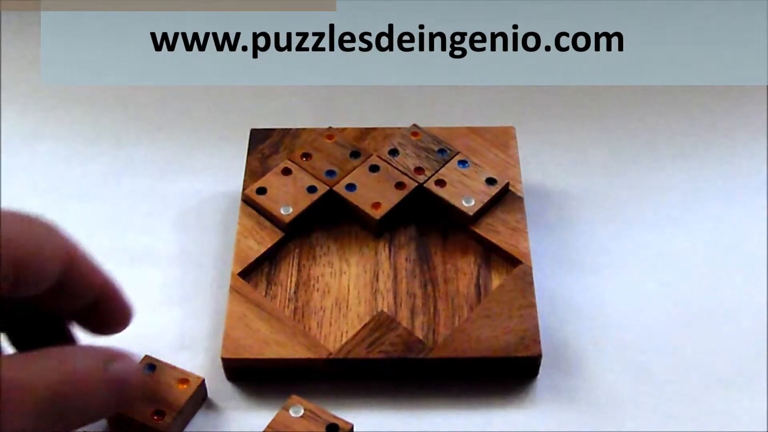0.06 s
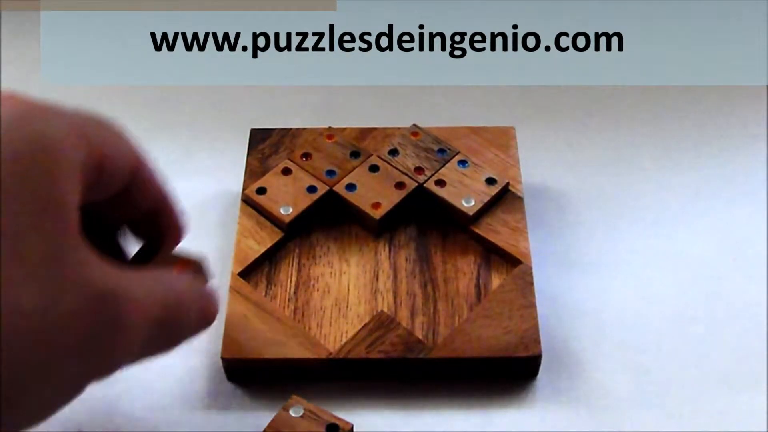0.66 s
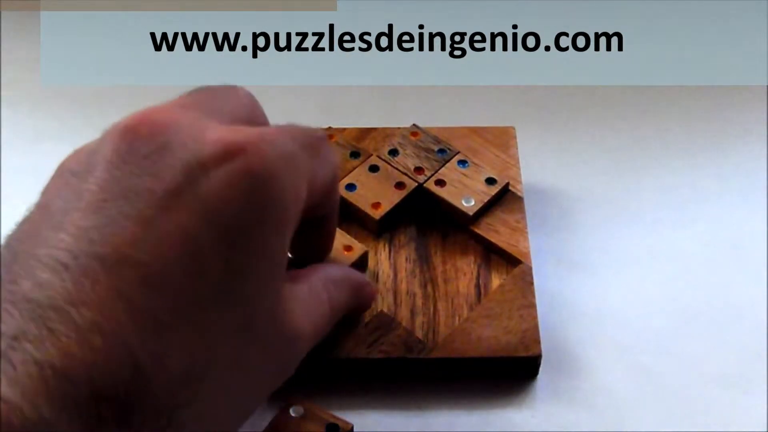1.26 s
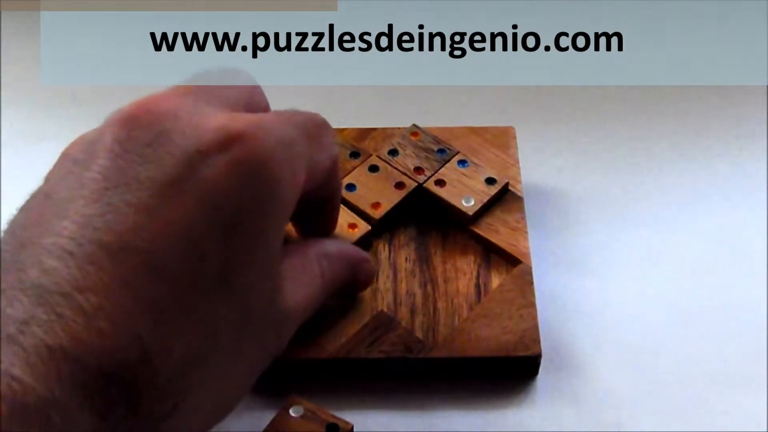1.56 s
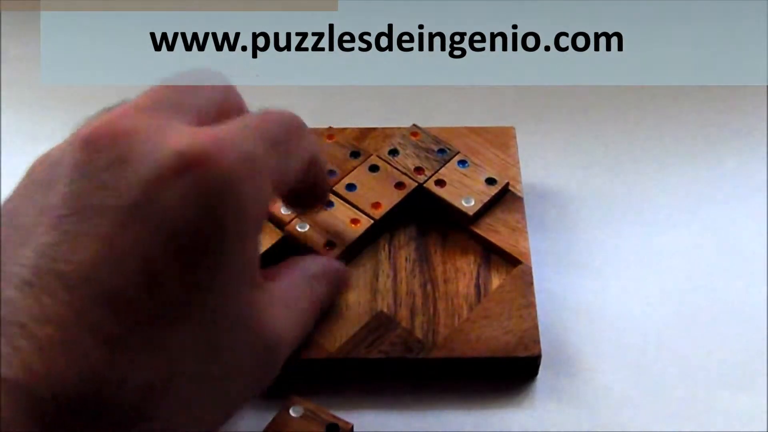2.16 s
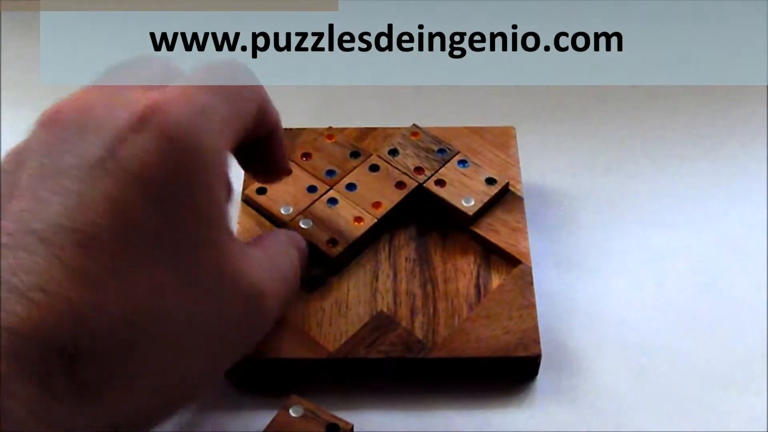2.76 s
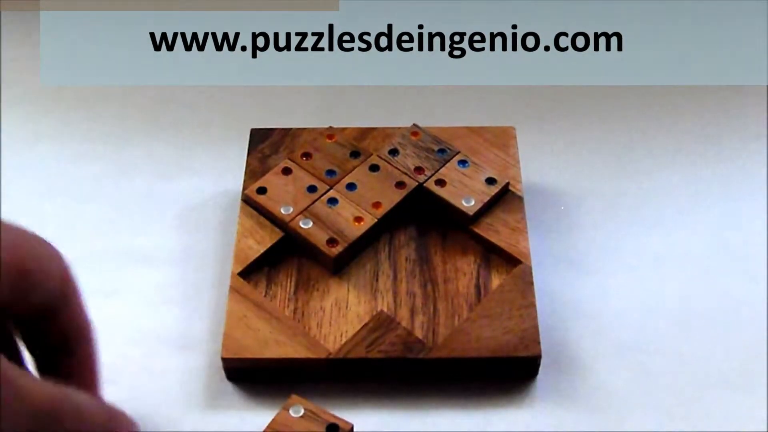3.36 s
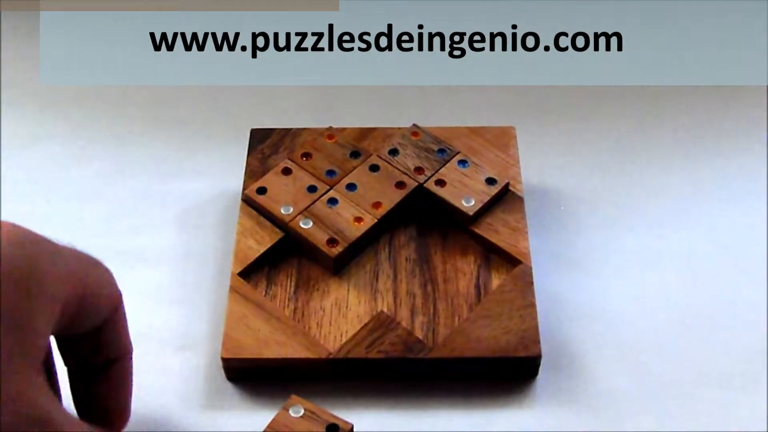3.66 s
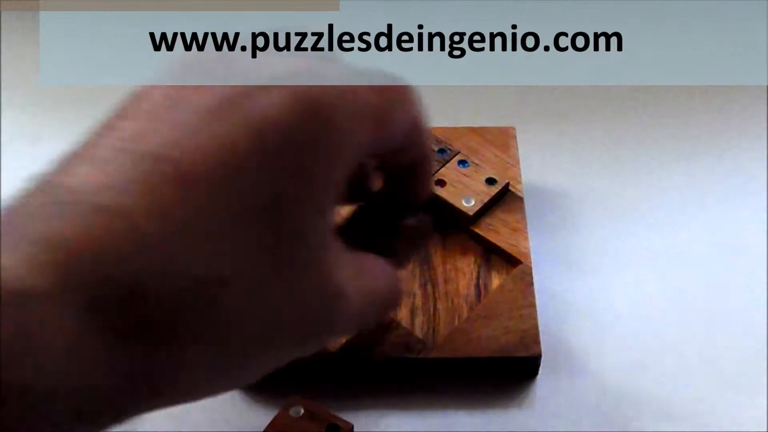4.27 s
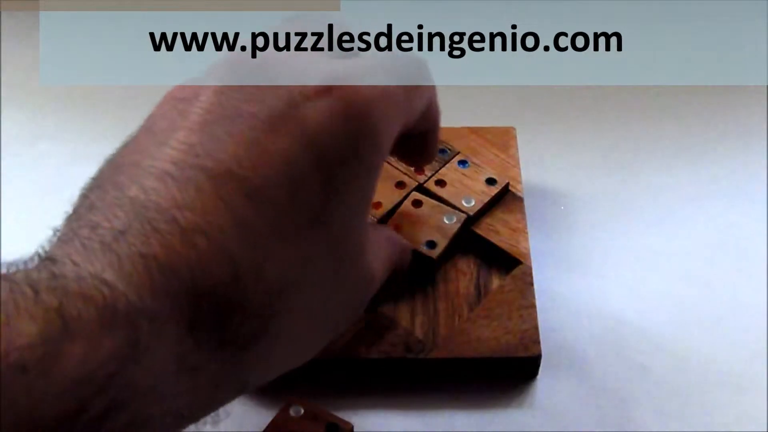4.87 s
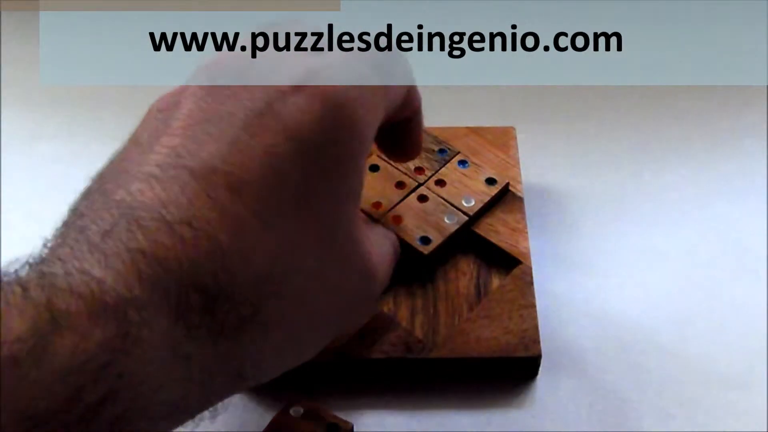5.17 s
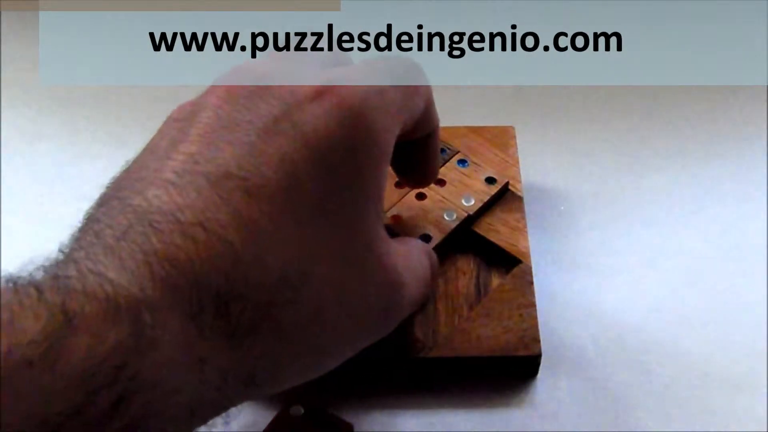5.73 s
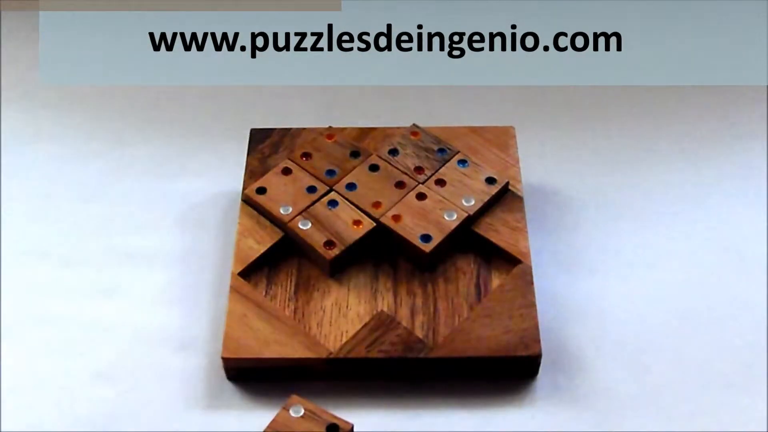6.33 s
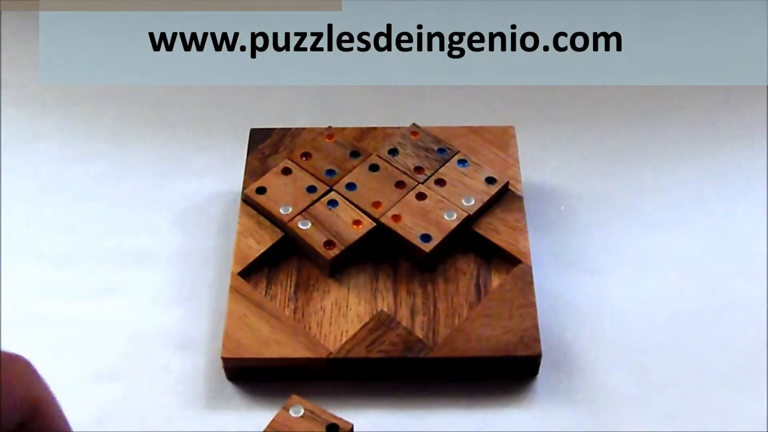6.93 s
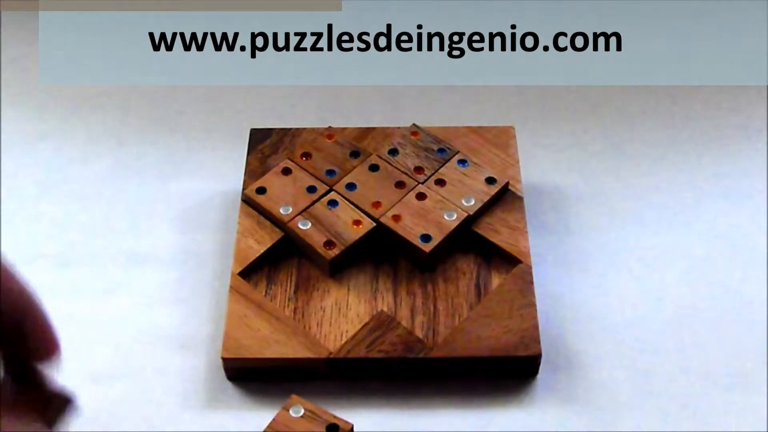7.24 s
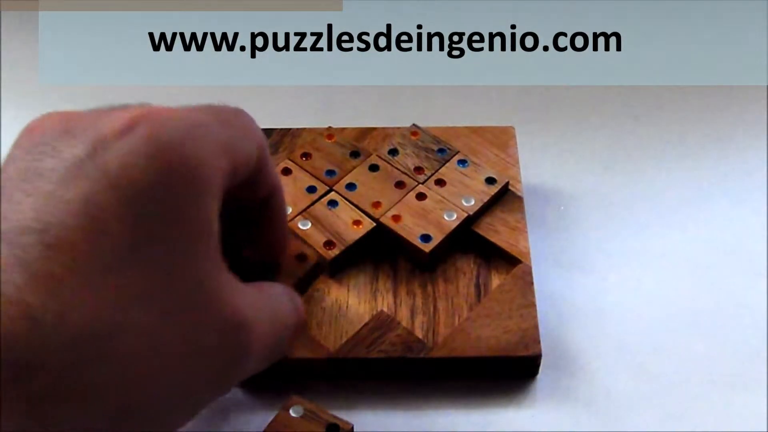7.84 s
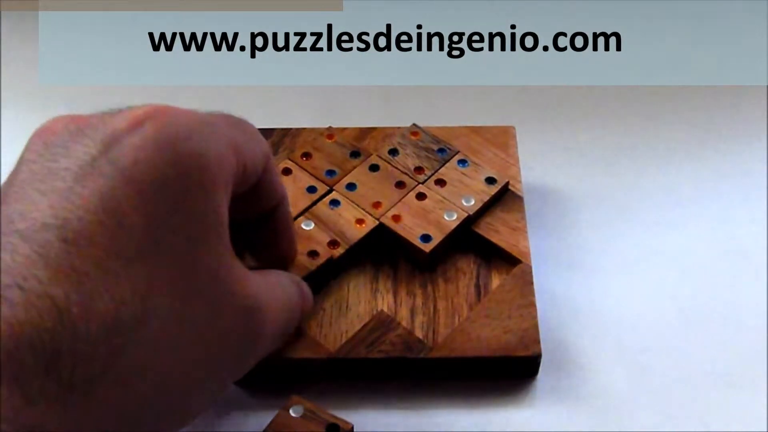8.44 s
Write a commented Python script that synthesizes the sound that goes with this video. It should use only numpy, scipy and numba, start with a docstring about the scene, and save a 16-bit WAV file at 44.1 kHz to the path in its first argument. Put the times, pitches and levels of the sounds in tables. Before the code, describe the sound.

Wooden domino blocks are set by hand into a wooden puzzle tray in a small room. The first rattles briefly against its neighbours and faintly slides into place. After a pause another snaps home with the loudest, bouncing clack. Soft taps and a last light clack follow near the end. Faint finger brushes and a steady low rumble and hiss fill the gaps, all picked up by one close microphone.

```python
"""Wooden domino blocks set by hand into a wooden puzzle tray, on a table in a small room; one close mono mic.
Over steady rumble, hiss and a thin whine, fingers brush the wood. Just past one second a block rattles
against its neighbours and slides into place. At about 4.7 s another snaps home with the loudest, bouncing
clack, and the gain control ducks. More brushes follow, then soft taps and a last light clack near 8.6 s.
Each contact rings block and tray for an instant, and the room answers with a short tail."""
import sys
import numpy as np
from scipy import signal
from scipy.fft import rfft, irfft
from scipy.io import wavfile
from numba import njit

SR = 44100
rng = np.random.default_rng(int(sys.argv[2]) if len(sys.argv) > 2 else 0)


def unload_audio(sound):
    """Save the sound as a 16-bit wav file, at the path given as the first command line argument."""
    columns = np.transpose(np.atleast_2d(sound))
    # keep every value between -1 and 1, then stretch to whole-number steps
    steps = np.round(np.clip(columns, -1, 1) * 32767)
    wavfile.write(sys.argv[1], SR, steps.astype(np.int16))


N = 383669

# The ring of a wooden block. Each row: frequency in Hz, level in dB, time to fall 60 dB in seconds.
BLOCK_MODES = [ (2456, -7, 0.013), (2700, -5, 0.009), (3104, -5, 0.016), (3255, -3, 0.0099),
               (4050, -16, 0.0093), (4736, -10.5, 0.012), (5360, -21.5, 0.013), (5730, -15, 0.0075),
               (6350, -1.5, 0.0031), (6860, -1.5, 0.0045), (7440, -7, 0.0091), (8250, -4.5, 0.006),
               (8730, -17, 0.0045), (9380, -6.5, 0.0048), (10360, -7, 0.0043), (11400, -8.5, 0.0053), ]


def knocks():
    """Every contact jolts the block and rings it and the tray; the meeting edges add a tiny tick."""
    # Each row: start in seconds, strength in dB, contact cut-off in Hz (higher is harder),
    # tilt (0 flat on the tray, 1 corner first), pitch ratio set by block and grip.
    contacts = [ (1.1598, -17, 2700, 0.76, 1.03), (1.209, -18, 3100, 0.94, 1),
                (1.214, -14.5, 7600, 0.9, 1.02), (1.2201, -16, 4400, 0.79, 0.96),
                (1.2346, -22, 3020, 1, 1.01), (4.613, -24, 4870, 0.24, 1.0),
                (4.6654, -24, 4600, 0.47, 0.93), (4.6764, -13.5, 8600, 0.5, 0.99),
                (4.6782, -7.5, 15000, 0.44, 1.0), (4.6945, -21.5, 4400, 0.96, 1.12),
                (4.701, -33, 6000, 0.16, 1.2), (4.7037, -31, 7000, 0.2, 1.1),
                (7.95, -33.5, 1900, .05, 1.02), (8.1555, -38.5, 2300, .15, 1.16),
                (8.556, -30, 2500, 0.86, 1), (8.635, -33, 2400, 0.85, 1.15),
                (8.643, -24.5, 6000, 0.11, 0.935), ]
    # The tray, damped by the table. Each row: frequency in Hz, level in dB, time to fall 60 dB in seconds.
    tray_modes = [(1045, -7.5, 0.0058), (1410, -16, 0.0071), (1700, -23, 0.0079)]
    out, t = np.zeros(N), np.arange(SR // 10) / SR
    twisting = np.isin(np.arange(len(BLOCK_MODES)), (2, 3))  # the block's two twisting modes
    for start, db, contact_hz, tilt, pitch in contacts:
        # a flat blow drives the tray; a blow on a corner twists the block and ticks
        twist_db = by_tilt(tilt, flat_db=-7.5, corner_db=-2.5)
        tray_db = by_tilt(tilt, flat_db=9, corner_db=-13.5)
        jolt_db = by_tilt(tilt, flat_db=2, corner_db=-15)
        tick_db = by_tilt(tilt, flat_db=-31, corner_db=-17)
        block = ring(BLOCK_MODES, t, pitch, contact_hz, spot_db=twist_db * twisting)
        block = butter(block, 2300, "high", order=6)  # a small block radiates little below its first mode
        block = butter(block, 11500, "low", order=7)  # wood absorbs the top octave
        tray = ring(tray_modes, t, pitch, contact_hz)
        tray = butter(tray, 920 * pitch, "high", order=6)
        tray = butter(tray, 2040, "low", order=4)
        edges = tick(t, hz=14700, width_hz=1100, peak_db=2, decay_s=0.0014)
        front = jolt(t, hz=1600 * pitch, t60_s=0.0042, lowest_hz=900 * pitch)
        clack = block + undb(tray_db) * tray + undb(jolt_db) * front + undb(tick_db) * edges
        add(out, undb(db) * clack, start)
    return out


def ring(modes, t, pitch, contact_hz, spot_db=0, paired_below_hz=3700):
    """Damped modes, weighted by the spot struck; a soft contact cannot drive the high ones."""
    hz, db, t60 = np.transpose(modes)
    gain = undb(db + spot_db) / np.sqrt(1 + (hz / contact_hz) ** 8)
    # some modes push the air towards the microphone first, others pull
    side = rng.choice([-1, 1], len(hz))
    # the two modes of a close pair move against each other and blend into one broad resonance
    twin = (np.arange(len(hz)) % 2 == 1) & (hz < paired_below_hz)
    side = np.where(twin, -np.roll(side, 1), side)
    tones = np.sin(2 * np.pi * np.outer(pitch * hz, t))
    decays = undb(-60 * t / t60[:, None])
    return (side * gain) @ (tones * decays)


def jolt(t, hz, t60_s, lowest_hz):
    """The whole block is stopped short and pushes out a cycle or two of air: the front of the knock."""
    push = np.sin(2 * np.pi * hz * t) * undb(-60 * t / t60_s)
    return butter(push, lowest_hz, "high", order=4)


def tick(t, hz, width_hz, peak_db, decay_s):
    """Sharp edges meet: a burst of noise with a glint high in the treble."""
    f = np.fft.rfftfreq(len(t), 1 / SR)
    glint = undb(peak_db * bell(f, hz, width_hz))
    return shaped_noise(glint, len(t)) * np.exp(-t / decay_s)


def slide(start_s, length_s, db, contact_hz, catches_per_s, rise_s):
    """The first block is eased along the tray: tiny catches of the grain ring it, ever more faintly."""
    out, t = np.zeros(N), np.arange(int(length_s * SR)) / SR
    catches = (rng.random(len(t)) < catches_per_s / SR) * rng.standard_normal(len(t))
    block = ring(BLOCK_MODES, t[:SR // 20], pitch=0.96, contact_hz=contact_hz)
    scrape = signal.fftconvolve(catches, block)[:len(t)]
    scrape = butter(scrape, 2270, "high", order=4)
    envelope = np.minimum(t / rise_s, 1) * (1 - t / length_s)
    add(out, level(scrape, db) * envelope, start_s)
    return out


def brushes():
    """Skin slides over smooth wood: short, airy swells."""
    # Each row: time of the peak in seconds, half length in seconds, level in dB.
    strokes = [(.68, 0.018, -54), (1.115, .02, -62), (3.89, .035, -58), (6.41, .035, -56.5),
               (7.473, 0.0085, -55)]
    t = np.arange(N) / SR
    swells = sum(undb(db) * bell(t, peak_s, 2 * half_s) for peak_s, half_s, db in strokes)
    friction = butter(rng.standard_normal(N), 9600, "high")
    return swells * level(friction, 0)


def room(x, tail_db, t60_s, treble_t60_s, build_s, wood_t60_s):
    """A small room: a few distinct echoes and a short tail whose treble dies first while wood rings on."""
    # Echoes off nearby surfaces. Each row: delay in seconds, level in dB.
    echoes = [(0.0101, -22), (0.0143, -19), (0.015, -15), (0.0194, -38), (0.0255, -32)]
    # Wood resonances in the tail. Each row: frequency in Hz, width in Hz, relative level in dB.
    wood_rings = [(2600, 160, -11), (3270, 270, 1), (4460, 230, 2), (5100, 160, 9), (6700, 220, -10)]
    t = np.arange(SR * 3 // 4) / SR
    f = np.fft.rfftfreq(len(t), 1 / SR)
    noise = butter(rng.standard_normal(len(t)), 2500, "high", order=1)
    mids = butter(noise, 5500, "low", order=1)
    treble = undb(-4) * (noise - mids)
    tail = mids * undb(-60 * t / t60_s) + treble * undb(-60 * t / treble_t60_s)
    peaks = sum(undb(db) * bell(f, hz, width) for hz, width, db in wood_rings)
    tail += shaped_noise(peaks, len(t)) * undb(-60 * t / wood_t60_s)
    tail *= 1 - np.exp(-(t / build_s) ** 2)
    response = undb(tail_db) * tail / np.sqrt(np.sum(tail ** 2))
    for delay, db in echoes:
        add(response, undb([db]), delay)
    return x + signal.fftconvolve(x, response)[:N]


def noise_floor(noise_db, whine_hz, whine_db):
    """Steady room rumble and hiss, with a thin electronic whine at the very top."""
    # Each row: frequency in Hz, relative noise density in dB.
    spectrum = [(15, -8), (35, 1), (90, -.5), (170, -2.5), (330, -7), (700, -14.5), (1200, -19),
                (1900, -23), (3700, -27.5), (5500, -29), (7000, -30), (9500, -32), (12500, -33),
                (15700, -33.5)]
    # Faint resonances in the hiss. Each row: frequency in Hz, width in Hz, boost in dB.
    hiss_peaks = [(3010, 410, 2.5), (4650, 430, 2)]
    f = np.fft.rfftfreq(N, 1 / SR)
    hz, db = np.transpose(spectrum)
    colour_db = np.interp(np.log(f + 1), np.log(hz), db)
    colour_db += sum(boost_db * bell(f, centre, width) for centre, width, boost_db in hiss_peaks)
    noise = shaped_noise(undb(colour_db), N)
    whine = np.sin(2 * np.pi * whine_hz * np.arange(N) / SR)
    return level(noise, noise_db) + level(whine, whine_db)


@njit
def gain_control(x, ceiling, lowest_gain, attack_s, hold_s, release_s):
    """A peak over the ceiling turns the gain down; it is held, then creeps back."""
    y, gain, aim, wait = np.empty(len(x)), 1., 1., 0.
    for i in range(len(x)):
        need = max(ceiling / (abs(x[i]) + 1e-9), lowest_gain)
        if need < aim:
            aim, wait = need, hold_s
        wait -= 1 / SR
        if wait < 0:
            aim = min(1., aim + 1 / (release_s * SR))
        gain += (aim - gain) / (attack_s * SR)
        y[i] = gain * x[i]
    return y


def by_tilt(tilt, flat_db, corner_db):
    """Level in dB between a flat blow and a blow on a corner."""
    return np.interp(tilt, [0, 1], [flat_db, corner_db])


def undb(db):
    """Decibels to gain."""
    return 10 ** (np.asarray(db) / 20)


def level(x, db):
    """Scale to an rms level."""
    return x * undb(db) / np.sqrt(np.mean(x ** 2))


def butter(x, hz, kind, order=2):
    """Causal low-pass or high-pass."""
    return signal.sosfilt(signal.butter(order, hz, kind, fs=SR, output="sos"), x)


def bell(x, centre, width):
    """Bell curve, 1 at its centre."""
    return np.exp(-2 * ((x - centre) / width) ** 2)


def shaped_noise(gains, n):
    """White noise, n samples long, coloured by one gain per frequency bin."""
    return irfft(rfft(rng.standard_normal(n)) * gains, n)


def add(track, sound, start_s):
    """Mix a sound into a track at a time."""
    start = int(start_s * SR)
    track[start:start + len(sound)] += sound[:len(track) - start]


def scene():
    """Blocks and hand close up in the small room, the same in both channels."""
    hand = brushes()
    background = noise_floor(noise_db=-46, whine_hz=15734, whine_db=-77)
    wood = knocks()
    wood += slide(start_s=1.3, length_s=0.31, db=-58.5, contact_hz=2400, catches_per_s=750, rise_s=0.035)
    clacks = room(wood, tail_db=-10, t60_s=0.24, treble_t60_s=0.14, build_s=0.0015, wood_t60_s=0.21)
    return np.array([clacks + hand + background] * 2)


def record(dry):
    """A close mono microphone with a narrow dip in the treble, gain control and a steep top cut."""
    dip_hz, dip_db, top_hz = 7800, -20, 15800
    x = dry.mean(axis=0)
    notched = signal.lfilter(*signal.iirnotch(dip_hz, Q=14, fs=SR), x)
    x = notched + undb(dip_db) * (x - notched)
    x = gain_control(x, ceiling=undb(-8), lowest_gain=undb(-4), attack_s=0.031, hold_s=0.44, release_s=1.0)
    top_cut = signal.ellip(12, rp=0.1, rs=70, Wn=top_hz, fs=SR, output="sos")
    x = signal.sosfilt(top_cut, x)
    return np.array([x, x])


dry = scene()
out = record(dry)
unload_audio(out)
```